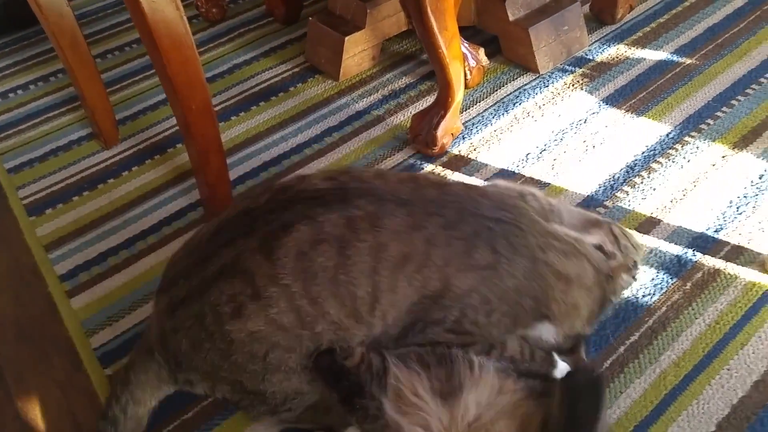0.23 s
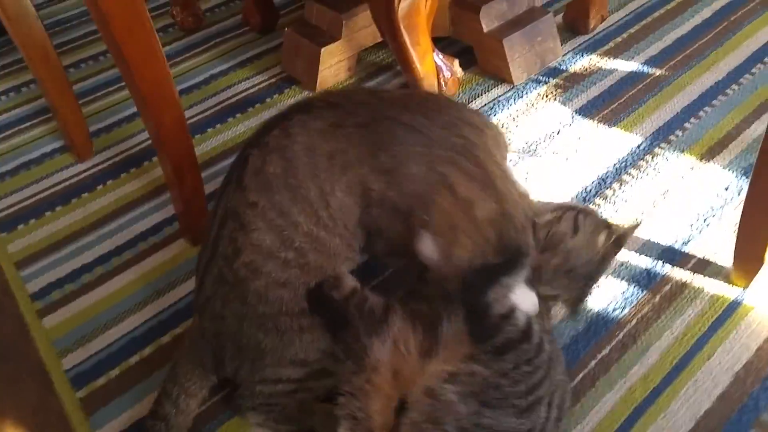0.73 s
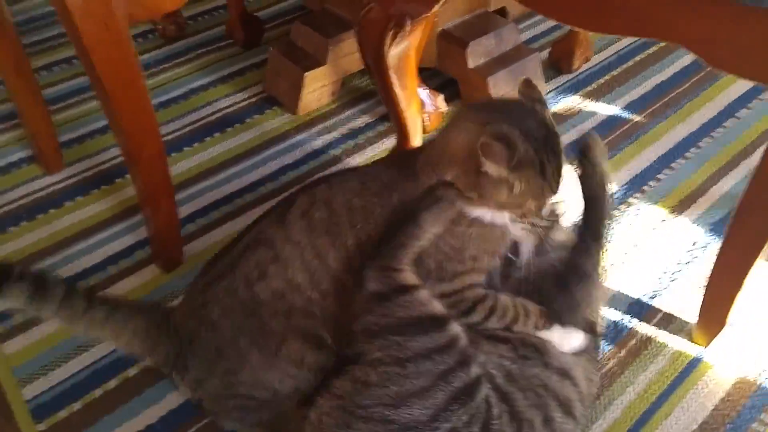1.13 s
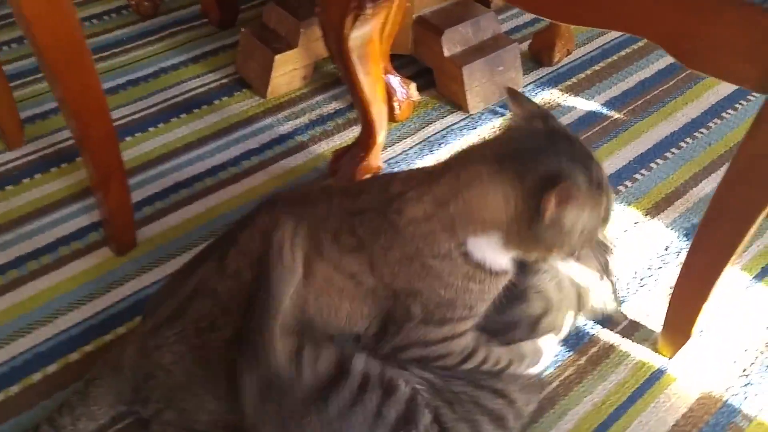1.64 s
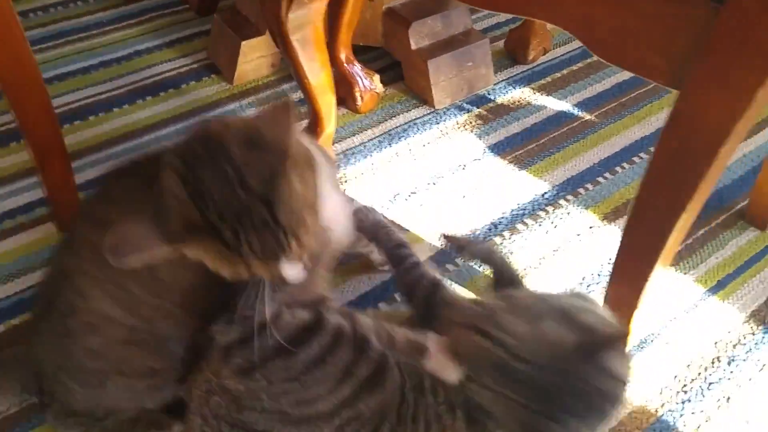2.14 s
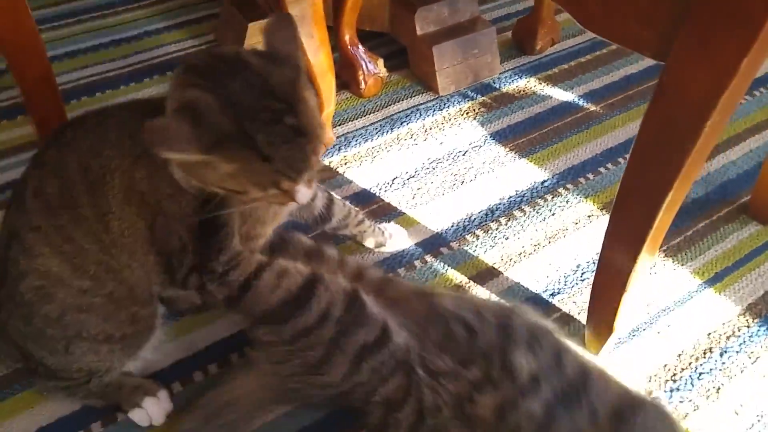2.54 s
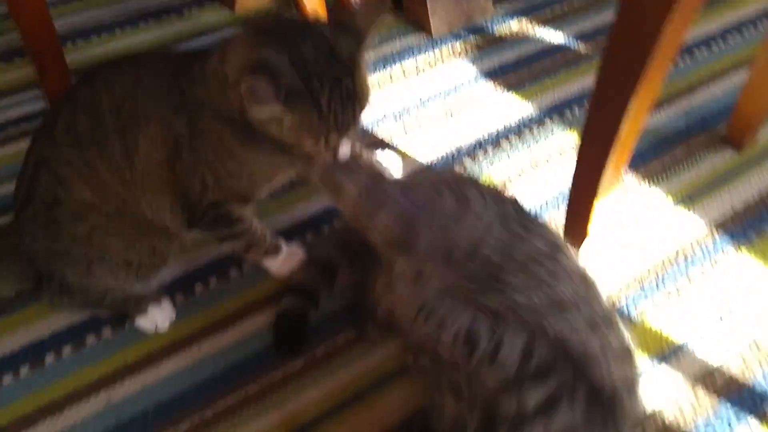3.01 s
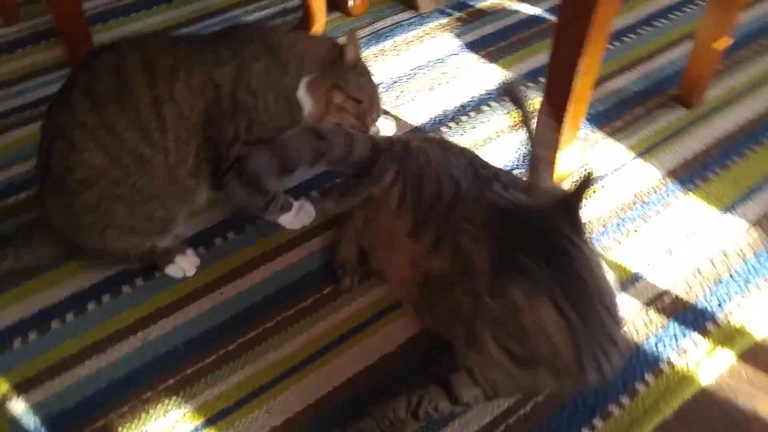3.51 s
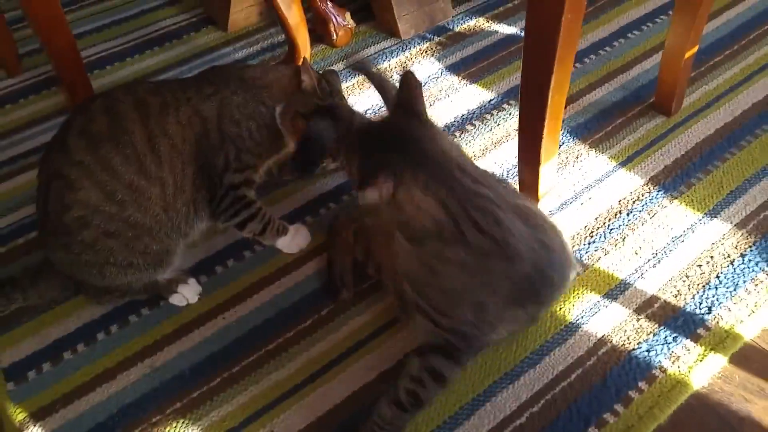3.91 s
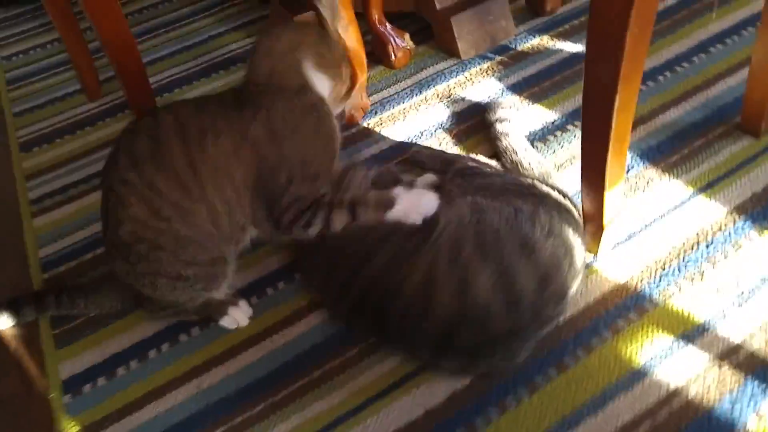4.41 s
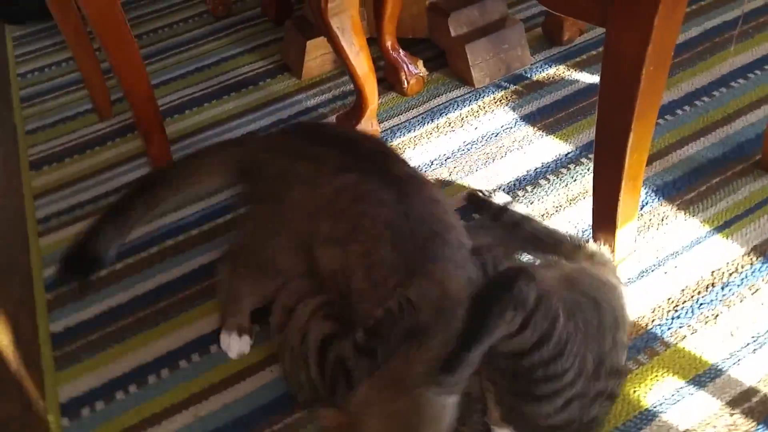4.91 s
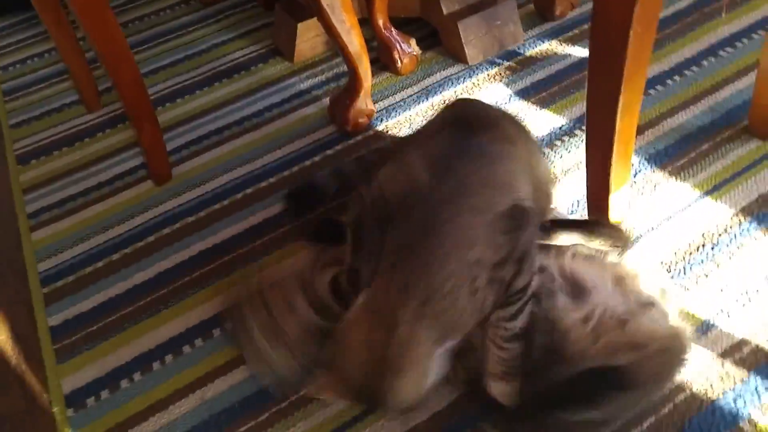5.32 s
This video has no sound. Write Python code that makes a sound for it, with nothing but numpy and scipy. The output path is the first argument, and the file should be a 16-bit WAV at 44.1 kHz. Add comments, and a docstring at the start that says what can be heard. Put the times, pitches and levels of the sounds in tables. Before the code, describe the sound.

Close stereo phone pickup of wrestling cats: bodies thump softly on a rug, boards knock underneath, fur swishes and claws crackle. After about three seconds, very loud ringing finger taps hit the microphone, followed by swelling brushing noise mainly on the right. Then quieter rustles, a few claw snags and heavy dull thuds finish. Short indoor echo, faint rapid ticking early, steady quiet hiss.

```python
"""Two cats wrestle on a rug over a wooden floor: padded blows slap the rug, ring board modes and echo in the room.
Fur and rug rustle as shaped noise that follows effort, blows and slides; paws swipe in noise bands, claws crack.
Midway, fingers tap and brush the two ports of a hand-held phone: ringing snaps and bursts of hiss.
The phone ticks faintly and regularly; behind lie a low room rumble and an even hiss."""
import sys
import numpy as np
from scipy import signal
from scipy.fft import rfft, irfft
from scipy.io import wavfile
from scipy.ndimage import uniform_filter1d

SR = 44100
rng = np.random.default_rng(int(sys.argv[2]) if len(sys.argv) > 2 else 0)


def put_to_file(sound):
    """Save the sound as 16-bit audio at rate SR, in the file named by the first command-line argument."""
    columns = np.atleast_2d(sound).T  # one column per channel
    safe = np.clip(columns, -1, 1)
    whole_steps = np.round(safe * 32767)
    wavfile.write(sys.argv[1], SR, whole_steps.astype(np.int16))


N = 244755
TIME = np.arange(N) / SR  # s

# blows on the floor: t/s, direct peak/dB, contact cut-off f/Hz, pitch factor, ring length factor,
# scuff level/dB and weight level/dB (peaks re board ring), room send level/dB
BLOWS = [ (0.786, -35.5, 307, 1.075, 0.78, -13.5, -7.5, -16.5),
         (1.144, -32.5, 640, 1.065, 0.94, -6, -23, -19.5), (1.332, -45.5, 815, 0.91, 0.44, 1.5, -21, -24),
         (1.6143, -26, 1680, 0.9, 0.42, -4, -13, -12.5), (1.632, -33.5, 480, 1.2, 0.73, -18, -10, -18),
         (1.661, -44.5, 475, 1.09, 1.2, -6, -17, -15), (1.867, -42, 944, 1.08, 0.26, -2.5, -25, -22),
         (2.631, -25.5, 446, 0.99, 0.64, -16, -44, -23.5), (2.8645, -33, 886, 2.55, 0.47, -3.5, -30, -36),
         (2.8713, -22, 2000, 1.35, 0.32, -11, -23, -24), (2.8753, -23, 655, 0.98, 0.52, -16.5, -16, -19),
         (3.2333, -45, 1200, 1.01, 0.27, -13.5, -15, -24), (3.4086, -42, 1310, 0.9, 0.36, -12, -7, -23),
         (4.593, -43.5, 455, 0.99, 1.23, -27, -4.5, -21), (4.84, -52.5, 421, 1.06, 0.72, -22, 8, -14),
         (4.9988, -30, 333, 1.006, 0.88, -31, -14.5, -20), (5.2235, -32, 770, 1.026, 1, -11.5, -19, -16.5),
         (5.3881, -41.5, 1100, 1.08, 0.44, -10, -11.5, -12.5), (5.501, -50, 880, 1.04, 1, -4, -7, -12), ]
# modes of the boards under the rug: f/Hz, level/dB, t60/s
BOARD_MODES = [(130, -41, .06), (205, -25, .045), (360, 0, .04), (600, -8, .028), (760, -7, .03),
               (950, -12, .025), (1250, -13, .028), (2200, -20, .02)]
SOFT_CONTACT_HZ = 500
# slap re board ring: the sharper the contact, the more it slaps
SLAP_DB, SLAP_DB_PER_OCTAVE, SLAP_MAX_DB = -16.5, 7.5, 2.5
# a nearby table top throws each blow back once
ECHO_S, ECHO_DB = 0.015, -9.5

# how hard the cats wrestle: t/s, effort level/dB
EFFORT_CURVE = [(0, 2), (0.2, 0), (0.42, -1.5), (0.7, -1.5), (0.9, 4.5), (1.35, 9), (1.48, -1.5), (1.6, -3),
                (1.8, 4), (2.2, 2.5), (2.4, -1), (2.54, 2), (2.7, 11.5), (3.0, 7.5), (3.13, 4), (3.32, 7),
                (3.56, 11), (3.87, -1.5), (4.11, -2.5), (4.25, 7), (4.52, 7), (4.74, 3.5), (4.86, 5),
                (4.96, 4.5), (5.2, -1), (5.55, -1.5)]
SWISH_DB, DRAG_DB = -71, -72  # fur and rug at effort 0 dB
# rustle as a body settles: levels after a blow of SETTLE_BLOW_DB, growth in dB per dB of blow
SETTLE_BLOW_DB, SETTLE_SWISH_DB, SETTLE_DRAG_DB, SETTLE_GROWTH = -35, -59, -53, 0.61
SETTLE_RISE_S, SETTLE_T60_S = 0.0057, 0.22
# a body or leg slides over the rug: middle t/s, length t/s, swish level/dB, drag level/dB
BODY_SLIDES = [(0.394, 0.08, -76, -65.5), (0.434, 0.028, -72.5, -82), (0.803, 0.049, -62.5, -78),
               (0.955, 0.14, -61, -63), (1.26, 0.33, -60.5, -62.5), (1.704, 0.22, -65, -55),
               (2.077, 0.14, -58.5, -70), (2.212, 0.054, -66.5, -72), (2.299, 0.06, -76, -62.5),
               (2.64, 0.13, -60.5, -64), (2.793, 0.22, -77, -56), (3.254, 0.04, -68, -57),
               (3.341, 0.058, -60, -56.5), (3.413, 0.033, -58, -65), (4.351, 0.085, -70, -60),
               (4.544, 0.042, -64.5, -54), (4.581, 0.051, -84, -55.5), (4.623, 0.03, -66, -56.5),
               (4.803, 0.047, -58, -52), (4.851, 0.099, -70, -56), (5.124, 0.2, -85, -67),
               (5.458, 0.11, -70, -65), (5.54, 0.13, -61.5, -77)]
# spectrum of fur rustle: f/Hz, level/dB
FUR_SPECTRUM = [(900, -10.5), (2100, -11.5), (3100, -17), (4000, -12.5), (5200, -11), (7100, -7.5),
                (8400, -6.5), (9200, -14), (11500, -21.5), (15500, -25)]
# spectrum of bodies dragging on the rug: f/Hz, level/dB
DRAG_SPECTRUM = [(150, -10), (350, -4), (500, -7), (690, 1.5), (900, -4), (1400, -12), (2200, -20),
                 (3200, -32)]
# tufts and threads that snag; CATCH_DB is re the even swish
CATCHES_PER_S, CATCH_SPREAD_DB, CATCH_DB = 260, 2.5, -6.5

# light paw swipes across the weave: middle t/s, length t/s, centre f/Hz, width/octaves, level/dB
PAW_SWIPES = [(0.299, 0.13, 6430, 0.043, -67), (0.51, 0.041, 7100, 0.1, -62),
              (0.895, 0.12, 4930, 0.22, -56.5), (2.084, 0.082, 5800, 0.23, -63.5),
              (2.594, 0.14, 743, 0.11, -63.5), (4.687, 0.026, 6350, 0.12, -60.5)]
# claws catching in the weave or clacking on the wood: t/s, peak level/dB, centre f/Hz, width/octaves,
# t60/s, left minus right level/dB
CLAW_CATCHES = [(0.5012, -41, 7300, 0.4, 0.017, 7), (1.6152, -51, 4660, 0.74, 0.01, 0),
                (1.627, -50, 4570, 0.27, 0.015, 0), (2.8692, -36, 9000, 0.44, 0.005, 0),
                (2.8722, -22.5, 3580, 0.92, 0.0024, 3), (2.8755, -32.5, 3400, 1.1, 0.03, -3),
                (2.884, -31, 7700, 0.4, 0.006, 6), (3.233, -40, 3000, 2, 0.0047, -13),
                (3.247, -44, 6400, 0.38, 0.0064, -21), (3.309, -41, 7770, 0.61, 0.006, -21),
                (3.336, -33, 4700, 1.4, 0.0034, -22), (4.128, -38, 3500, 2.6, 0.0071, 1),
                (4.5373, -46, 6530, 1.5, 0.014, -14), (4.677, -37.5, 6540, 0.58, 0.008, 21),
                (4.7945, -38, 4470, 1.9, 0.0069, 13), (4.829, -41, 7800, 0.56, 0.007, 7)]

# fingertip taps on a port: t/s, thud f/Hz, thud peak level/dB, snap f/Hz, snap peak level/dB,
# second catch delay t/s, grit level/dB, left minus right level/dB
PORT_TAPS = [ (3.1582, 656, -12.5, 7710, -1, 0.00084, -19, 16),
             (3.5145, 680, -40, 6000, -29, 0.0002, -4, -17),
             (3.5196, 790, -27.5, 6360, -9, 0.00058, -1.5, -31),
             (3.5222, 670, -31, 6000, -36, 0.0004, 0, -36),
             (3.5268, 313, -15.5, 4370, -23, 0.00023, -26, -46),
             (3.5278, 722, -19, 6500, -52, 0.0004, -10, -28),
             (3.5312, 397, -31, 8350, -34, 0.0002, 10, -26), ]
# ring of a port's duct: multiple of snap f, level/dB, t60/s
DUCT_MODES = [(0.038, -20.5, 0.012), (0.161, -14, 0.0052), (0.311, -14, 0.0036), (.45, -22.5, 0.0022),
              (.68, -16, 0.0012), (1, 4, 0.002), (1.75, -16, 0.001)]
# fingers brushing a port: middle t/s, length t/s, hiss level/dB, hiss pitch factor, hollow level/dB,
# hollow f/Hz, hiss tilt/(dB per octave), left minus right level/dB
PORT_RUBS = [ (2.833, 0.087, -41.5, 0.94, -69, 800, 1.5, 7.5),
             (3.528, 0.024, -35.5, 0.83, -29.5, 768, -3, -16), (3.642, 0.078, -34, 1.13, -56, 1350, 1, -17),
             (3.675, 0.11, -26.5, 0.97, -41.5, 880, 6, -13.5),
             (3.746, 0.14, -28, 0.89, -39.5, 900, 6, -17.5), (3.789, 0.12, -37.5, 0.96, -49, 780, 6, -13),
             (3.816, 0.094, -47, 1, -42.5, 687, 0, -12), (3.95, 0.1, -57.5, 0.94, -54, 760, -0.5, -4.5),
             (4.027, 0.05, -53, 1.06, -52, 800, 0, -10), (4.059, 0.092, -53, 1.07, -48.5, 765, -0.5, -9),
             (4.1314, 0.012, -43, 1.12, -50, 447, 3, 3.5), (4.161, 0.08, -47, 0.93, -47, 670, -1, -8),
             (4.205, 0.048, -44, 1.03, -35.5, 690, 2, -17), (4.224, 0.025, -39.5, 1.03, -44, 760, 4, 1),
             (4.236, 0.038, -50, 1.03, -49, 750, 1, -6), (4.426, 0.062, -47, 0.94, -53, 785, 1.5, -6), ]
# spectrum of the brushing hiss at pitch factor 1, untilted: f/Hz, level/dB
RUB_SPECTRUM = [(30, -38), (70, 11), (200, -2), (420, 11.5), (600, -80), (1100, 1), (1700, 2), (3200, -5.5),
                (5000, -5), (6500, -1.5), (7200, 5), (8200, -3.5), (10200, -11), (15500, -20)]

# the phone's regular tick; it ends before TICK_END_S
TICK_FIRST_S, TICK_PERIOD_S, TICK_END_S = 0.4258, 0.1024, 3.61
# tick strength before scatter: t/s, peak level/dB
TICK_STRENGTH = [(0.43, -46), (0.53, -43), (0.63, -40), (0.74, -47.5), (0.84, -34), (1.04, -47.5),
                 (1.35, -39), (1.5, -49.5), (1.66, -40), (1.85, -46.5), (2.55, -44), (2.8, -44),
                 (3.09, -49), (3.2, -40.5), (3.6, -54)]
# spectrum of the tick: f/Hz, level/dB
TICK_SPECTRUM = [(1000, -34), (3000, -21), (5500, -32.5), (7200, 14.5), (8500, 7), (10500, -3),
                 (15500, -21)]
TICK_SCATTER_DB, TICK_PAN_DB = 5, 21  # pan: left minus right

# spectrum of rumble and hiss in the room: f/Hz, level/dB
ROOM_SPECTRUM = [(20, -8), (35, -22), (60, 18.5), (100, 14), (170, 4), (390, 11), (510, -13), (680, 6),
                 (1200, -40.5), (2000, -1), (3200, -53), (8000, -18), (11000, -12.5), (16000, -31)]
ROOM_DB = -71.5
# the ports' narrow notch: f/Hz, level/dB
PORT_NOTCH = [(7400, 0), (7750, -5), (8100, 0)]
LOW_CUT_HZ, TOP_HZ = 46, 15900


def thumps(scuff_t60_s=0.12, scuff_rise_s=0.0039, slap_t60_s=0.025, weight_t60_s=0.12,
           rug_band_hz=(380, 1500), weight_band_hz=(70, 260)):
    """Each blow slaps the rug, rings the boards and scuffs on; the body's weight adds a dull thud."""
    direct, room_send, t = np.zeros((2, N)), np.zeros((2, N)), TIME[:SR // 4]
    for s, db, contact_hz, pitch, length, scuff_db, weight_db, room_db in BLOWS:
        friction = butter(pair(len(t), 0.37), rug_band_hz, "band", order=1)
        # fur and pile soften the contact
        friction = butter(friction, 1.03 * contact_hz, "low", order=5)
        slap_db = SLAP_DB + SLAP_DB_PER_OCTAVE * np.log2(contact_hz / SOFT_CONTACT_HZ)
        slap = peak(friction * fade(t, slap_t60_s), min(slap_db, SLAP_MAX_DB))
        scuff_shape = (1 - np.exp(-t / scuff_rise_s)) * fade(t, scuff_t60_s)
        scuff = peak(friction * scuff_shape, scuff_db)
        weight = butter(pair(len(t), 0.91) * fade(t, weight_t60_s), weight_band_hz, "band")
        weight = peak(weight, weight_db)
        blow = peak(boards(t, contact_hz, pitch, length) + slap + scuff + weight, db)
        add(direct, s, blow)
        add(direct, s + ECHO_S, amp(ECHO_DB) * blow)
        add(room_send, s, amp(room_db) * blow)
    return direct + room(room_send)


def boards(t, contact_hz, pitch, length, knock_db_per_octave=2.0):
    """A padded contact swells, then damps; a sharp one favours the knocking modes above 500 Hz."""
    sharp_octaves = np.log2(max(contact_hz / SOFT_CONTACT_HZ, 1))
    knock_db = knock_db_per_octave * sharp_octaves
    modes = [(hz, db + knock_db * (hz > 500), t60_s) for hz, db, t60_s in BOARD_MODES]
    press = t ** 1.5
    return peak(butter(press * ring(modes, t, pitch, length), contact_hz, "low"), 0)


def room(x, t60_s=0.33, dull_hz=3000, delay_s=0.0059):
    """Short diffuse tail of a furnished room: delayed, decaying, low-passed noise."""
    t = TIME[:SR // 2]
    tail = butter(pair(len(t), 0.95) * fade(t, t60_s) * (t > delay_s), dull_hz, "low", order=1)
    tail = tail / np.sqrt(np.sum(tail[0] ** 2))
    return signal.fftconvolve(x, tail, axes=-1)[:, :N]


def scuffle(flutter_db=1.23, weight_grain_db=2):
    """Hairs slip with an even swish and snags; the weight of the bodies drags lower on the rug."""
    _, _, swish_dbs, drag_dbs = np.transpose(BODY_SLIDES)
    flutter = amp(flutter_db * walk(40))
    hairs = unit(colour(pair(N, 0.078), FUR_SPECTRUM))
    weight = unit(colour(pair(N, 0.22) * amp(weight_grain_db * walk(150)), DRAG_SPECTRUM))
    swish = (hairs + amp(CATCH_DB) * snags()) * movement(SWISH_DB, SETTLE_SWISH_DB, swish_dbs)
    drag = weight * movement(DRAG_DB, SETTLE_DRAG_DB, drag_dbs)
    return flutter * (swish + drag)


def movement(steady_db, settle_db, slide_dbs):
    """Rubbing strength: steady effort, settling after each blow and single slides add in power."""
    power = amp(steady_db + np.interp(TIME, *np.transpose(EFFORT_CURVE))) ** 2
    for s, blow_db, *_ in BLOWS:
        since = np.maximum(TIME - s, 0)
        settle = (1 - np.exp(-since / SETTLE_RISE_S)) * fade(since, SETTLE_T60_S)
        level_db = settle_db + SETTLE_GROWTH * (blow_db - SETTLE_BLOW_DB)
        power = power + (amp(level_db) * settle) ** 2
    for (s, length_s, *_), db in zip(BODY_SLIDES, slide_dbs):
        slide = np.cos(np.pi * np.clip((TIME - s) / length_s, -.5, .5))
        power = power + (amp(db) * slide) ** 2
    return np.sqrt(power)


def snags():
    """Tufts and threads let go at random moments, a few much harder than the rest."""
    chance, size = rng.random(N), rng.exponential(size=N)
    strength = (chance < CATCHES_PER_S / SR) * amp(CATCH_SPREAD_DB * size)
    return unit(colour(pair(N, 0.36) * strength, FUR_SPECTRUM))


def swipes(grain_db=3):
    """A paw zips over the threads: grainy noise through one resonance, swelling and fading."""
    out = np.zeros((2, N))
    for s, length_s, hz, octaves, db in PAW_SWIPES:
        threads = pair(SR // 4, 0.099) * amp(grain_db * walk(1000)[:SR // 4])
        swish = unit(resonance(threads, hz, octaves)[:, :int(length_s * SR)])
        add(out, s - length_s / 2, amp(db) * swish * np.hanning(swish.shape[1]))
    return out


def claws():
    """A claw catches and lets go with a tiny crack: decaying noise through a doubled resonance."""
    out, t = np.zeros((2, N)), TIME[:SR // 40]
    for s, db, hz, octaves, t60_s, pan_db in CLAW_CATCHES:
        burst = pair(len(t), 0.26) * fade(t, t60_s)
        crack = resonance(resonance(burst, hz, octaves), hz, octaves)
        add(out, s, sides(pan_db) * peak(crack, db))
    return out


def taps(swell_s=0.0025, slip_s=0.00198, slip_rise_s=0.00052, catch_min_hz=6000, grit_t60_s=0.0039):
    """A fingertip presses air in a port, slips off and rings the duct; a thinner catch follows."""
    out, t = np.zeros((2, N)), TIME[:SR // 20]
    for s, thud_hz, thud_db, snap_hz, snap_db, catch_s, grit_db, pan_db in PORT_TAPS:
        press = -(t / swell_s) ** 2 * np.exp(-2 * t / swell_s)
        thud = press * np.sin(2 * np.pi * thud_hz * t)
        grit = butter(rng.standard_normal(len(t)), 11000, "low") * fade(t, grit_t60_s)
        snap = ring(DUCT_MODES, t, snap_hz) + amp(grit_db) * grit
        snap = snap * (1 - np.exp(-t / slip_rise_s))
        since = np.maximum(t - catch_s, 0)
        upper = [mode for mode in DUCT_MODES if mode[0] * snap_hz > catch_min_hz]
        catch = ring(upper, since, snap_hz) * (1 - np.exp(-since / slip_rise_s))
        add(out, s, sides(pan_db) * peak(thud, thud_db))
        add(out, s + slip_s, sides(pan_db) * peak(snap + catch, snap_db))
    return out


def rubs(hollow_octaves=0.56):
    """Skin drags over a port: a hiss in the duct and a hollow note of the cupped air."""
    out = np.zeros((2, N))
    for s, length_s, hiss_db, pitch, hollow_db, hollow_hz, tilt_db, pan_db in PORT_RUBS:
        friction = pair(SR // 4, 0.23)
        spectrum = [(hz * pitch, db) for hz, db in RUB_SPECTRUM]
        hiss = unit(colour(friction, spectrum, tilt_db))
        hollow = resonance(friction, hollow_hz, hollow_octaves)
        hollow = unit(butter(hollow, 1.8 * hollow_hz, "low"))
        stroke = (amp(hiss_db) * hiss + amp(hollow_db) * hollow)[:, :int(length_s * SR)]
        add(out, s - length_s / 2, sides(pan_db) * stroke * np.hanning(stroke.shape[1]))
    return out


def ticks(t60_s=0.005):
    """The phone ticks beside its left port: short coloured noise bursts, uneven in strength."""
    out, t = np.zeros((2, N)), TIME[:SR // 40]
    for s in np.arange(TICK_FIRST_S, TICK_END_S, TICK_PERIOD_S):
        burst = rng.standard_normal(len(t)) * fade(t, t60_s)
        tick = colour(np.pad(burst, len(t)), TICK_SPECTRUM)
        db = np.interp(s, *np.transpose(TICK_STRENGTH)) + TICK_SCATTER_DB * rng.standard_normal()
        add(out, s - len(t) / SR, sides(TICK_PAN_DB) * peak(tick, db))  # offset undoes the padding
    return out


def room_tone():
    """Faint rumble of the house and even hiss: coloured noise that wavers slightly in level."""
    waver_db = .8 * walk(6)
    return unit(colour(pair(N, 0.93), ROOM_SPECTRUM)) * amp(ROOM_DB + waver_db)


def amp(db):
    """Amplitude factor of a level in dB."""
    return 10 ** (np.asarray(db) / 20)


def unit(x):
    """Scale to rms 1."""
    return x / np.sqrt(np.mean(x ** 2))


def peak(x, db):
    """Scale to a peak level."""
    return x * amp(db) / np.abs(x).max()


def add(out, s, x):
    """Mix a sound in at a time in s."""
    i = int(s * SR)
    out[:, i:i + x.shape[-1]] += x[..., :N - i]


def sides(pan_db):
    """Gains of both ports; the nearer one gets it all."""
    return amp(np.minimum([[pan_db], [-pan_db]], 0))


def fade(t, t60_s):
    """Exponential decay, 60 dB in t60_s."""
    return np.exp(-np.log(1000) * t / t60_s)


def colour(x, points, tilt_db=0):
    """Filter by an outline of f/Hz, level/dB, tilted in dB per octave."""
    hz, db = np.transpose(points)
    octave = np.log2(np.fft.rfftfreq(x.shape[-1], 1 / SR) + 1)
    gain = amp(np.interp(octave, np.log2(hz), db) + tilt_db * octave)
    return irfft(rfft(x) * gain, x.shape[-1])


def butter(x, hz, kind, order=2):
    """Butterworth low-, high- or band-pass."""
    return signal.sosfilt(signal.butter(order, hz, kind, fs=SR, output="sos"), x)


def resonance(x, hz, octaves):
    """One resonance: a first-order band around hz."""
    half = 2 ** (octaves / 2)
    return butter(x, [hz / half, hz * half], "band", order=1)


def pair(size, alike):
    """Noise at two ports; alike is the shared fraction of power."""
    shared = rng.standard_normal(size)
    return np.sqrt(alike) * shared + np.sqrt(1 - alike) * rng.standard_normal((2, size))


def walk(rate_hz):
    """Smooth random wander with rms 1."""
    k = int(SR / rate_hz)
    steps = np.repeat(rng.standard_normal(N // k + 1), k)
    return unit(uniform_filter1d(steps, k)[:N])


def ring(modes, t, pitch, length=1):
    """Sum of damped modes, neighbours starting in opposite directions."""
    return sum((-1) ** k * amp(db) * np.sin(2 * np.pi * hz * pitch * t) * fade(t, t60_s * length)
               for k, (hz, db, t60_s) in enumerate(modes))


def scene():
    """Cats on the rug, fingers at the phone, the room behind."""
    cats = thumps() + scuffle() + swipes() + claws()
    phone = taps() + rubs() + ticks()
    return cats + phone + room_tone()


def record(dry):
    """The phone's ports notch the treble; it drops the deepest bass and cuts the top."""
    heard = butter(colour(dry, PORT_NOTCH), LOW_CUT_HZ, "high", order=3)
    return signal.sosfilt(signal.ellip(10, .2, 80, TOP_HZ, fs=SR, output="sos"), heard)


dry = scene()
out = record(dry)
put_to_file(out)
```